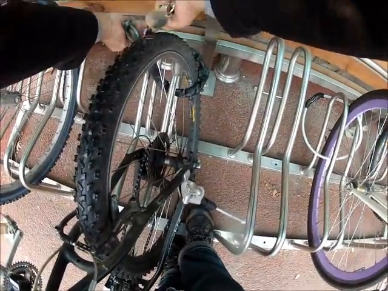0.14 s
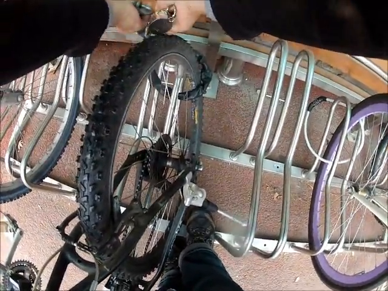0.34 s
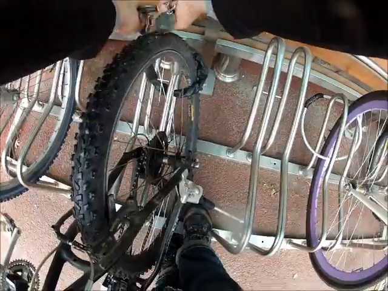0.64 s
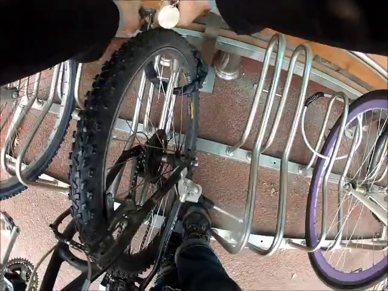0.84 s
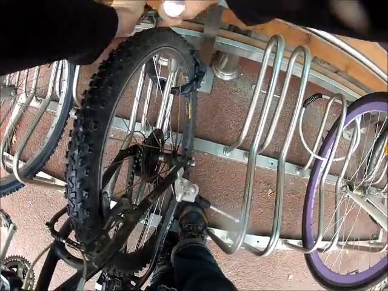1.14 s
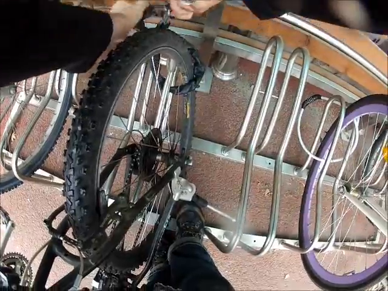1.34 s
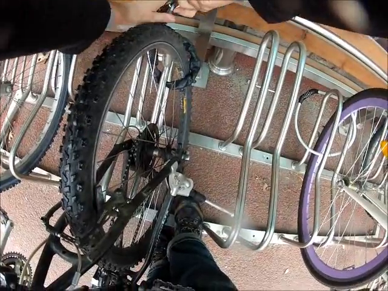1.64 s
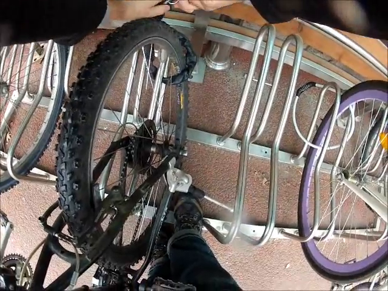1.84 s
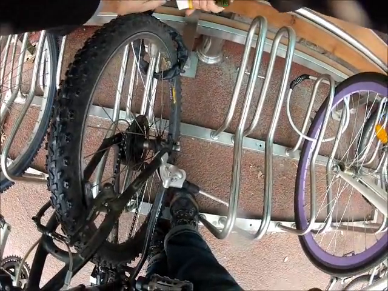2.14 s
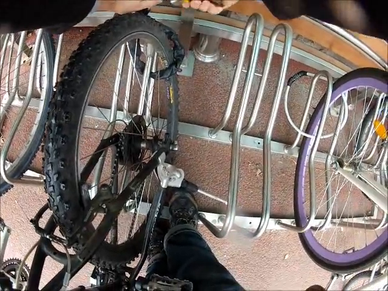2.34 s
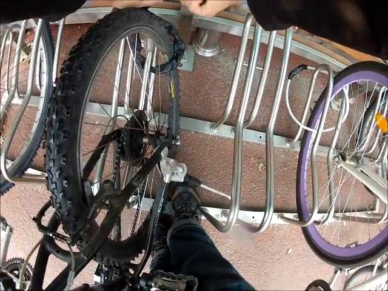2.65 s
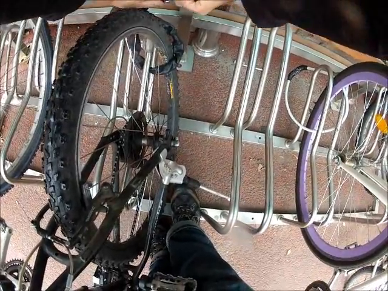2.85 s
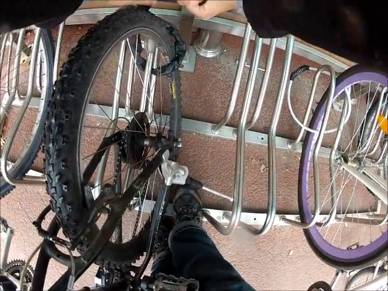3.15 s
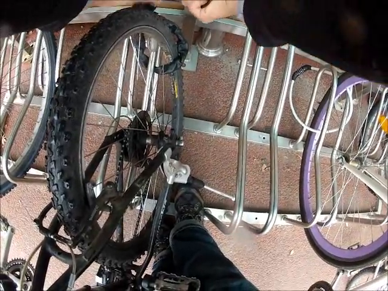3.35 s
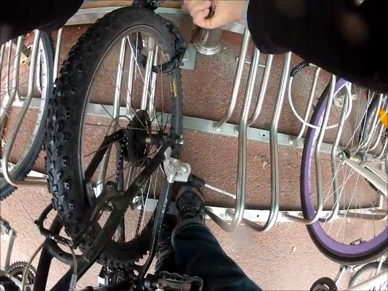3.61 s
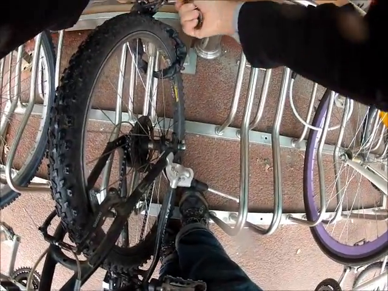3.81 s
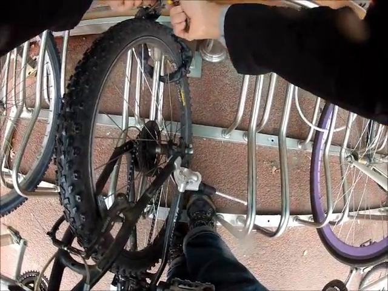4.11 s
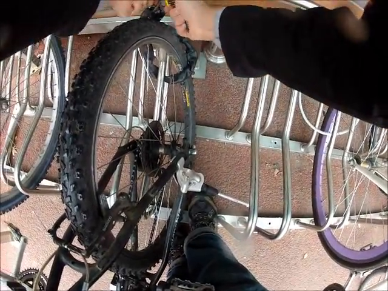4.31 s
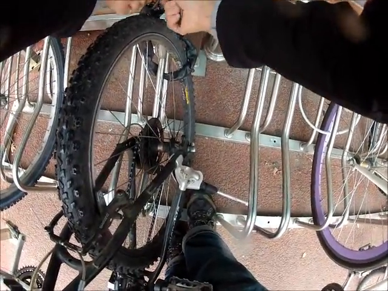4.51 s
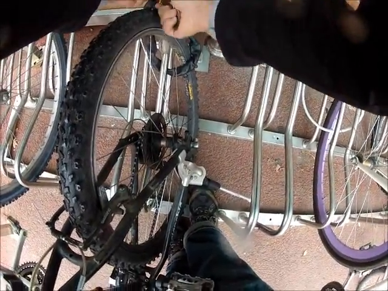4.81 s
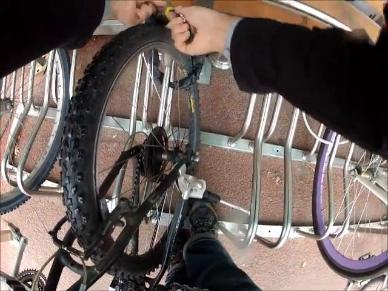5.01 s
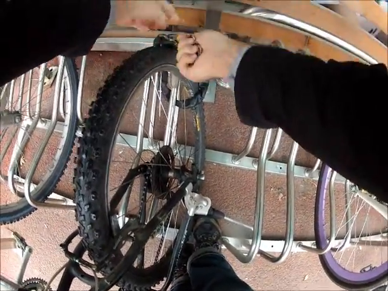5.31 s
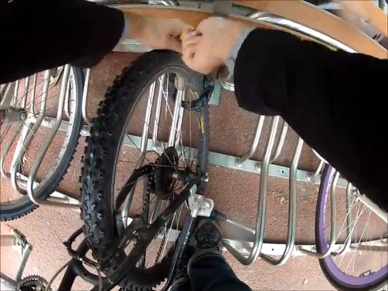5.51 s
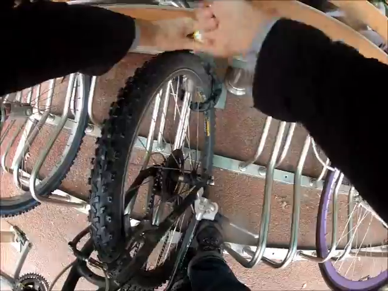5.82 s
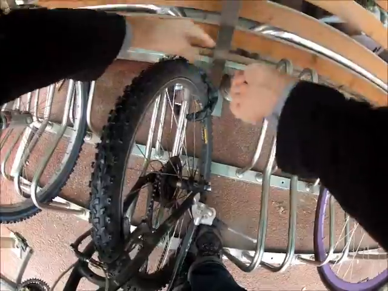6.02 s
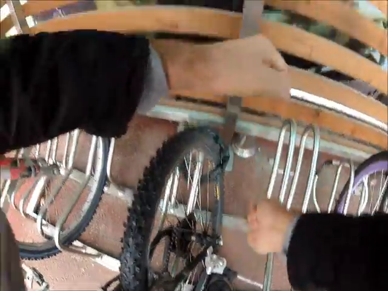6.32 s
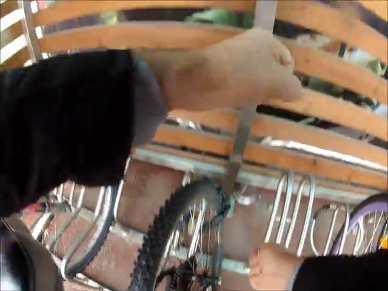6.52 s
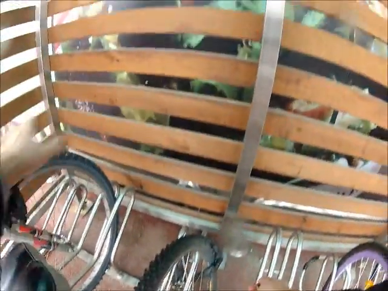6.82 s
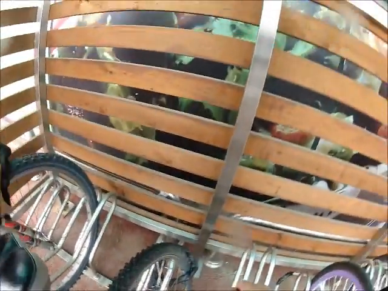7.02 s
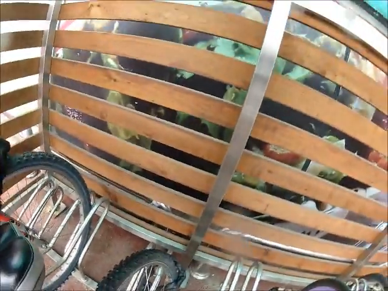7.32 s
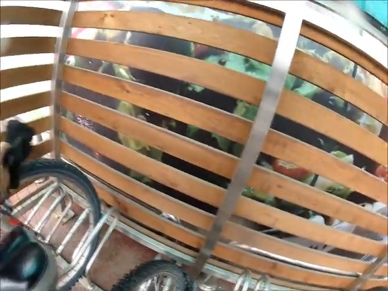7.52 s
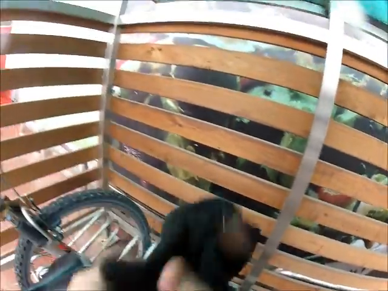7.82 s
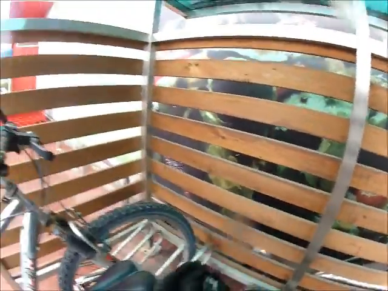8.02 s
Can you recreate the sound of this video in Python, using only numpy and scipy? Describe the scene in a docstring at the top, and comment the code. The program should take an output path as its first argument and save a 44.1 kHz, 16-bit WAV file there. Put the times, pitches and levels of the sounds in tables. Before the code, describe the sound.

Outdoors in a slatted bike shelter, a small bird trills quickly over low distant traffic. Close by, a key and lock tick sparsely, with a few dull thumps. After six seconds the lock bangs hard and bounces on a steel rack, its cable rasps downward in pitch, and its metal end chatters and rings. Soft handling follows. The small camera microphone sounds coarse, with a glassy top.

```python
"""A bicycle lock ticks, knocks and clanks against a steel rack in a slatted shelter, close to a small camera.
Key and lock ticks are short noise snaps with ringing parts; the steel blows are cracks, ringing tones and a wash.
The cable slides as gritty noise of sinking pitch, and chattering blows of the lock's steel end ring the rack.
A small bird trills in gliding whistles over distant traffic made of shaped noise and two engine drones.
The camera's coarse sampling adds a glassy top."""
import sys
import numpy as np
from scipy import signal
from scipy.fft import irfft
from scipy.io import wavfile
from scipy.ndimage import uniform_filter1d

SR = 44100
rng = np.random.default_rng(int(sys.argv[2]) if len(sys.argv) > 2 else 0)


def waveform_to_disk(signal):
    """Save audio, clipped to [-1, 1], as 16-bit WAV at the path in sys.argv[1]."""
    frames = np.transpose(np.atleast_2d(signal))
    scaled = np.clip(frames, -1, 1) * 32767
    samples = np.round(scaled).astype(np.int16)
    wavfile.write(sys.argv[1], SR, samples)


N = 359415

# Levels in dB; some functions add a gain of their own, while rubs and engine use them as they stand.

# distant traffic roar, as a noise spectrum: [f/Hz, level/dB]
ROAR_SPECTRUM = [(20, -10), (29, 3.5), (42, -2.5), (100, -3), (150, -5), (260, 1), (400, -5), (620, -10),
                 (720, -12.5), (830, -20), (1100, -28.5), (2000, -44)]
# tyre noise, as a noise spectrum: [f/Hz, level/dB]
TYRE_SPECTRUM = [(330, -25), (480, -1), (580, 1.0), (680, -2), (800, -39), (1200, -60)]
# airy hiss, as a noise spectrum: [f/Hz, level/dB]
HISS_SPECTRUM = [(500, -20), (1200, -4.5), (2200, 3), (3000, 0.5), (4000, -8.5), (5000, -9), (5900, -24)]
# a far engine picks up a little, then eases off and fades: [t/s, firing f/Hz, level/dB]
ENGINE_COURSE = [(0, 54, -45), (2.001, 57, -39), (3.2, 56, -40.5), (3.9, 60, -40), (5.1, 60, -43.5),
                 (6.0, 55, -54)]
# runs of the bird's trill: [first note t/s, last note t/s, level/dB, pitch where the notes land f/Hz]
TRILL_RUNS = [(.003, .313, -36.5, 2480), (.365, 1.243, -37, 2620), (1.295, 1.45, -37.5, 2460),
              (1.502, 2.226, -38.5, 2815), (2.277, 2.794, -38.5, 2880), (2.956, 3.215, -39.5, 2885),
              (3.581, 3.633, -47.5, 2920), (3.887, 4.145, -45.5, 2950)]
# the clearest contacts of key and lock: [t/s, level/dB, centre f/Hz]
KEY_TICKS = [(0.567, -40, 3080), (0.7834, -37.5, 3040), (0.954, -32.5, 2550), (1.1261, -22.5, 3460),
             (1.92, -39, 2860), (3.142, -22, 4940), (3.1786, -35.5, 2630), (3.189, -36, 2920),
             (4.57, -38.5, 3620), (4.6827, -26.5, 4330), (4.7546, -43.5, 2240), (5.1475, -42, 3030),
             (5.2765, -44, 2930), (5.85, -30.5, 2930), (5.8705, -36, 3080), (6.6907, -31, 2600),
             (6.7116, -30, 2150), (6.861, -35, 2390), (7.868, -33.5, 2330)]
# spells of fiddling that scatter fainter ticks: [start t/s, end t/s, level/dB]
FIDDLING_SPELLS = [(2.18, 2.36, -44), (6.113, 6.31, -40)]
# ringing of the lock's small parts: [f/Hz, level/dB, time to fall 60 dB t60/s]
LOCK_PART_MODES = [(2030, -9, 0.034), (2753, 2, 0.015), (3643, -1, 0.033), (4230, -0.5, 0.028),
                   (4910, 2.5, 0.022), (5250, 0, 0.017)]
# sleeve and cable rubbing, and a brief squeak of the key at 2.005 s: [t/s, rise/s, t60/s, centre f/Hz,
# width/Hz, level/dB]
RUB_STROKES = [(2.005, 0.024, 0.28, 4600, 450, -46), (5.87, 0.013, 0.27, 2600, 2000, -42.5),
               (6.1, 0.2, 1, 2770, 1910, -48.5), (6.34, 0.023, 0.84, 2700, 1650, -34.5),
               (6.402, 0.013, 0.055, 1670, 1270, -27.5), (6.63, 0.053, 1, 526, 340, -31.5),
               (7.88, 0.26, 1, 2240, 2980, -44.5), (7.982, 0.0079, 0.29, 3000, 2330, -26.5),
               (7.89, 0.03, .3, 180, 200, -32.5), (8.01, 0.022, 0.27, 437, 600, -29)]
# dull knocks on tyre, frame and camera: [t/s, f/Hz, t60/s, level/dB]
DULL_KNOCKS = [(2.805, 60, 0.082, -22), (2.811, 309, 0.1, -21.5), (3.018, 238, 0.074, -24),
               (3.051, 50, 0.11, -20), (6.331, 486, 0.089, -20.5), (6.344, 561, 0.22, -18.5),
               (6.36, 346, 0.17, -22), (6.384, 224, 0.08, -18), (6.408, 527, 0.19, -20.5),
               (6.912, 581, 0.15, -21.5), (8.005, 1110, 0.023, -18), (8.037, 920, 0.02, -18.5),
               (8.129, 456, 0.04, -24)]
# the lock body hits the rack and bounces: [t/s, level/dB]
BODY_HITS = [(6.4072, -1), (6.4095, 1.5), (6.4122, -12), (6.4155, -13), (6.433, -6), (6.438, -7),
             (6.446, -3.5), (6.46, -10)]
# ringing of lock against rack: [f/Hz, level/dB, t60/s]
RACK_MODES = [(1599, -16, 0.96), (2016, -3, .32), (2145, -14.5, 0.58), (2233, 8.5, 0.45), (2520, 0, 0.28),
              (2610, -2, 0.35), (2720, -14, .5), (2894, -2, 0.13), (3094, 21, 0.053), (3280, 7, 0.13),
              (3290, -13, 0.55), (3730, 12, 0.13), (3710, 13, 0.11), (4124, -12, 0.98), (4370, -8, .16),
              (4580, -33, .2), (4760, 3.5, 0.22), (5000, -5, 0.21), (5160, -10, 0.74)]
# dense ring of the body's blows, as a noise spectrum: [f/Hz, level/dB]
RACK_SPECTRUM = [(100, -18), (500, 4), (1000, -11), (1600, -2.5), (2200, 7.5), (3300, 3.5), (4300, -3),
                 (5100, 3), (5900, -12.5)]
# the lock's steel end chatters on a hoop: [t/s, level/dB]
END_HITS = [(6.9087, -1), (6.911, 0.5), (6.914, 4.5), (6.9163, 2), (6.921, -19)]
# ringing of the steel end: [f/Hz, level/dB, t60/s]
END_MODES = [(1292, -4, .25), (1653, -6, .26), (2148, -10, .33), (2622, -12, .42), (2702, -8, .42),
             (3033, 2, .18), (3445, -4, .19), (3623, 0, .18), (4140, -17, .3), (4834, -3, .19),
             (5010, 5, .44), (5109, -4, .3), (5572, -16, .25)]
# dense ring of the steel end's blows, as a noise spectrum: [f/Hz, level/dB]
END_SPECTRUM = [(100, -22), (700, -12), (1300, -3.5), (2200, -3), (3200, 1), (4200, -11), (5100, 8),
                (5900, -14.5)]

VAN_FIRING_HZ = 82.1
# the lower a note lands under the bird's clear pitch, the further it drops and the stronger its octave
NOTE_PERIOD_S, CLEAR_HZ, DROP_PER_HZ = .05168, 2925, 1.4
OCTAVE_SHARE, OCTAVE_SHARE_PER_HZ = 0.16, 0.0014
FIDDLE_PER_S, FIDDLE_HZ, FIDDLE_SCATTER_DB = 21, 2900, 1
# the cable slides down the hoop: it bites, runs, then slows; its pitch sinks all the way
SLIDE_START_S, SLIDE_END_S, SLIDE_ATTACK_S, SLIDE_HOLD_S = 6.44, 6.89, 0.043, 0.17
SLIDE_DB, SLIDE_FADE_DB_PER_S, SLIDE_HZ, SLIDE_SAG_HZ_PER_S = -31, 53, 2710, 2400
TOP_HZ = 15350  # the camera passes little above this


def amp(db):
    """Turn decibels into gain."""
    return 10 ** (np.asarray(db) / 20)


def unit(x):
    """Scale a sound to rms 1."""
    return x / np.sqrt(np.mean(x ** 2))


def add(out, s, sound):
    """Mix a sound in at time s, cutting off what runs past the end."""
    i = max(int(s * SR), 0)
    out[i:i + len(sound)] += sound[:max(N - i, 0)]


def fade(t, t60):
    """Die away smoothly, 60 dB down after t60 seconds."""
    return np.exp(-np.log(1000) * t / t60)


def noise(points, size):
    """Make noise of rms 1 whose spectrum follows (Hz, dB) points, with random phases."""
    hz, db = np.transpose(points)
    f = np.fft.rfftfreq(size, 1 / SR) + 1  # the 1 keeps the logarithm finite
    level = amp(np.interp(np.log(f), np.log(hz), db))
    phase = 2 * np.pi * rng.random(len(f))
    return unit(irfft(level * np.exp(1j * phase), size))


def band(x, hz, width):
    """Pass a sound through a resonance twice, for steep sides."""
    b, a = signal.iirpeak(hz, hz / width, fs=SR)
    once = signal.lfilter(b, a, x)
    return signal.lfilter(b, a, once)


def walk(rate):
    """Wander randomly around zero with rms 1, drawing about rate new values a second."""
    k = int(SR / rate)
    steps = np.repeat(rng.standard_normal(N // k + 1), k)
    smooth = uniform_filter1d(uniform_filter1d(steps, k), k)
    return unit(smooth[:N])


def ring(modes, t):
    """Sum the dying tones of a struck object; each contact starts them at new random phases."""
    hz, db, t60 = np.transpose(modes)[:, :, None]
    phase = rng.random(hz.shape)
    tones = np.sin(2 * np.pi * (hz * t + phase))
    return np.sum(amp(db) * fade(t, t60) * tones, axis=0)


def passing(nearest_s, pass_s, db):
    """Gain of a vehicle on a straight road: db when nearest, 3 dB less pass_s before and after."""
    return amp(db) / np.hypot(1, (np.arange(N) / SR - nearest_s) / pass_s)


def drone(hz, wander_hz, throb_db):
    """The firing tone of a far engine, a sine never quite steady in pitch or level."""
    phase = 2 * np.pi * np.cumsum(hz + wander_hz * walk(8)) / SR
    return np.sqrt(2) * np.sin(phase) * amp(throb_db * walk(7.4))


def traffic(roar_db, tyres_db, hiss_db, flutter_db):
    """A dull roar, tyre noise that swells as a car passes, two engine drones and a thin hiss."""
    s, *columns = np.transpose(ENGINE_COURSE)
    engine_hz, engine_db = (np.interp(np.arange(N) / SR, s, c) for c in columns)
    roar = noise(ROAR_SPECTRUM, N) * amp(roar_db + flutter_db * walk(14))
    car = passing(nearest_s=1.33, pass_s=1.06, db=-42)
    tyres = noise(TYRE_SPECTRUM, N) * np.hypot(amp(tyres_db), car)
    engine = drone(engine_hz, wander_hz=1.97, throb_db=2.4) * amp(engine_db)
    van = drone(VAN_FIRING_HZ, wander_hz=0.74, throb_db=2.0)
    van *= passing(nearest_s=7.52, pass_s=0.42, db=-37)
    hiss = noise(HISS_SPECTRUM, N) * amp(hiss_db + 0.1 * walk(3.8))
    return roar + tyres + engine + van + hiss


def bird(note_s, drop_s, rough, waver_hz, scatter_db, echo_s, echo_db, tail_db, tail_t60, gain_db):
    """Quick whistles drop onto their pitch, hoarser the further they drop; a wall and the yard echo them."""
    out = np.zeros(N)
    t = np.arange(int(note_s * SR)) / SR
    swell = np.sqrt(np.sin(np.pi * t / note_s))
    high = np.exp(-(t / drop_s) ** 2)  # 1 at the start of a note, falling as it lands
    for first, last, db, landing_hz in TRILL_RUNS:
        drop = DROP_PER_HZ * max(CLEAR_HZ - landing_hz, 0)
        octave = OCTAVE_SHARE + OCTAVE_SHARE_PER_HZ * drop
        count = round((last - first) / NOTE_PERIOD_S) + 1
        for s in first + NOTE_PERIOD_S * np.arange(count):
            tremor = unit(uniform_filter1d(rng.standard_normal(SR // 10), size=40))[:len(t)]
            base_hz = landing_hz + waver_hz * rng.standard_normal()
            hz = base_hz + drop * (high + rough * tremor)
            phase = 2 * np.pi * np.cumsum(hz) / SR
            # the octave comes through as the note lands
            note = np.sin(phase) + octave * (1 - high) * np.sin(2 * phase)
            level = amp(db + gain_db + scatter_db * rng.standard_normal())
            add(out, s, level * swell * note)
    # the yard is a dying noise tail, the wall a single echo within it
    t = np.arange(SR // 2) / SR
    yard = rng.standard_normal(len(t)) * fade(t, tail_t60)
    yard *= amp(tail_db) / np.linalg.norm(yard)
    yard[int(echo_s * SR)] += amp(echo_db)
    return out + signal.fftconvolve(out, yard)[:N]


def fiddle():
    """Faint ticks at uneven intervals while the fingers work: rows of (s, dB, Hz)."""
    rows = []
    for start, end, db in FIDDLING_SPELLS:
        # one tick falls at random within each of up to eight equal slots
        for k, (late, strength) in enumerate(rng.random(size=(8, 2))):
            s = start + (k + late) / FIDDLE_PER_S
            if s < end:
                rows.append((s, db + FIDDLE_SCATTER_DB * (2 * strength - 1), FIDDLE_HZ))
    return rows


def ticks(gain_db, ring_db, snap_t60, bounce_s, bounce_db, tail_db, tail_t60):
    """Each tick is a snap and a tiny rebound in the lock's parts, with a faint tail from the shelter."""
    out, t = np.zeros(N), np.arange(SR // 5) / SR
    decay = fade(t, snap_t60) + amp(tail_db) * fade(t, tail_t60)
    for s, db, hz in KEY_TICKS + fiddle():
        for lag, contact_db in ((0, 0), (bounce_s, bounce_db)):
            snap = unit(band(rng.standard_normal(len(t)), hz, 2850)) * decay
            contact = snap + amp(ring_db) * ring(LOCK_PART_MODES, t)
            add(out, s + lag, amp(db + contact_db + gain_db) * contact)
    return out


def rubs(grain_db):
    """Short strokes of uneven friction: gritty bands of noise that swell and die."""
    out, t = np.zeros(N), np.arange(N) / SR
    for s, rise, t60, hz, width, db in RUB_STROKES:
        grit = rng.standard_normal(N) * amp(grain_db * walk(300))
        swell = np.exp(np.minimum(t - s, 0) / rise)
        stroke = swell * fade(np.maximum(t - s, 0), t60)
        out += amp(db) * stroke * unit(band(grit, hz, width))
    return out


def knocks(spread, soft_s, gain_db):
    """Soft blows: one dying tone with a weaker band of noise around it, and a softened start."""
    out, t = np.zeros(N), np.arange(SR // 3) / SR
    for s, hz, t60, db in DULL_KNOCKS:
        cluster = unit(band(rng.standard_normal(len(t)), hz, hz * spread))
        body = np.sin(2 * np.pi * hz * t) + 0.53 * cluster
        onset = 1 - np.exp(-t / soft_s)
        add(out, s, amp(db + gain_db) * body * fade(t, t60) * onset)
    return out


def blows(hits, modes, colour, ring_db, crack_db, crack_t60, wash_db, wash_t60):
    """Steel on steel: a short crack, clear ringing tones, and a wash of dense modes and shelter echo."""
    out, t = np.zeros(N), np.arange(SR * 3 // 4) / SR
    decay = amp(crack_db) * fade(t, crack_t60) + amp(wash_db) * fade(t, wash_t60)
    for s, db in hits:
        dense = noise(colour, len(t)) * decay
        add(out, s, amp(db) * (dense + amp(ring_db) * ring(modes, t)))
    return out


def slide(grain_db, width_hz, ring_db, rasp_db):
    """The cable rasps along the steel: noise of sinking pitch, also heard through the rack's resonances."""
    t = np.arange(N) / SR
    age = np.clip(t, SLIDE_START_S, SLIDE_END_S) - SLIDE_START_S
    touching = np.minimum(age / SLIDE_ATTACK_S, 1) * (t < SLIDE_END_S)
    db = SLIDE_DB - SLIDE_FADE_DB_PER_S * np.maximum(age - SLIDE_HOLD_S, 0)
    hz = SLIDE_HZ - SLIDE_SAG_HZ_PER_S * age
    grip = amp(grain_db * walk(400))
    # slow noise times a gliding tone gives a band of noise around that pitch
    lowpass = signal.butter(2, width_hz, fs=SR, output="sos")
    slip = unit(signal.sosfilt(lowpass, rng.standard_normal(N)))
    gliding = unit(slip * np.cos(2 * np.pi * np.cumsum(hz) / SR))
    rasp = grip * (gliding + amp(rasp_db) * noise(RACK_SPECTRUM, N))
    steel = sum(amp(mode_db) * band(rasp, f, 29) for f, mode_db, _ in RACK_MODES)
    return touching * amp(db) * (unit(rasp) + amp(ring_db) * unit(steel))


def scene():
    """The lock in front, bird and traffic behind."""
    outside = traffic(roar_db=-37.5, tyres_db=-51.5, hiss_db=-52.0, flutter_db=0.5)
    outside += bird(note_s=.016, drop_s=.0105, rough=.33, waver_hz=14, scatter_db=1,
                    echo_s=.029, echo_db=-8, tail_db=-2, tail_t60=.26, gain_db=.3)
    lock = ticks(gain_db=-1.5, ring_db=-5, snap_t60=0.015, bounce_s=0.0043, bounce_db=-6,
                 tail_db=-14.5, tail_t60=0.15)
    lock += rubs(grain_db=2.0)
    lock += knocks(spread=0.42, soft_s=0.0011, gain_db=1)
    lock += blows(BODY_HITS, RACK_MODES, RACK_SPECTRUM, ring_db=-33, crack_db=-6, crack_t60=0.017,
                  wash_db=-24.0, wash_t60=0.5)
    lock += slide(grain_db=1.5, width_hz=470, ring_db=-11, rasp_db=1.5)
    lock += blows(END_HITS, END_MODES, END_SPECTRUM, ring_db=-29.5, crack_db=-14, crack_t60=0.019,
                  wash_db=-27, wash_t60=0.41)
    return (lock + outside)[None]


def record(dry):
    """The camera rounds peaks, samples at 12 kHz and holds each value, which mirrors the sound above 6 kHz."""
    rounded = .7 * np.tanh(dry / .7)
    coarse = signal.resample_poly(rounded, 40, 147, axis=1)  # 44.1 to 12 kHz
    steps = np.repeat(coarse, 4, axis=1)  # each value held four times, at 48 kHz
    held = signal.resample_poly(steps, 147, 160, axis=1)[:, :N]  # back to 44.1 kHz
    lowpass = signal.ellip(10, .2, 80, TOP_HZ, fs=SR, output="sos")
    return signal.sosfilt(lowpass, held)


dry = scene()
out = record(dry)
waveform_to_disk(out)
```